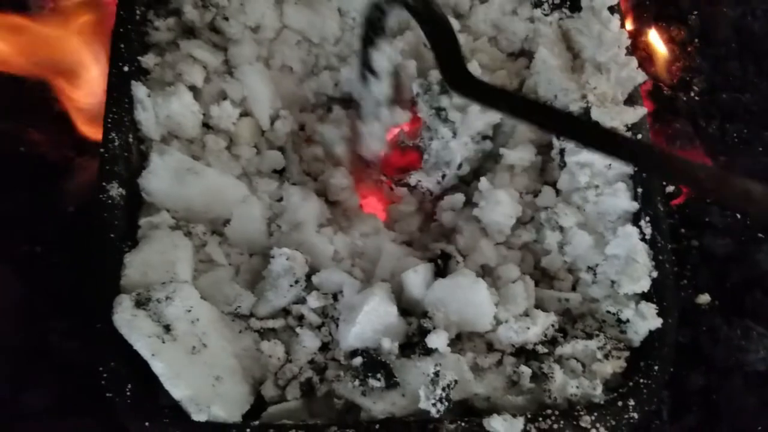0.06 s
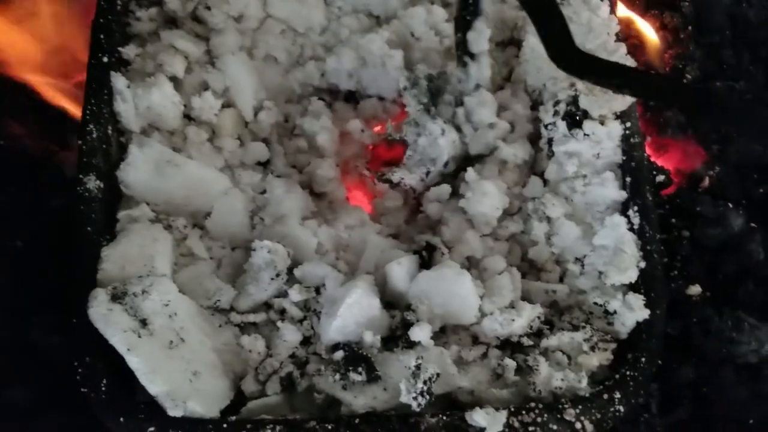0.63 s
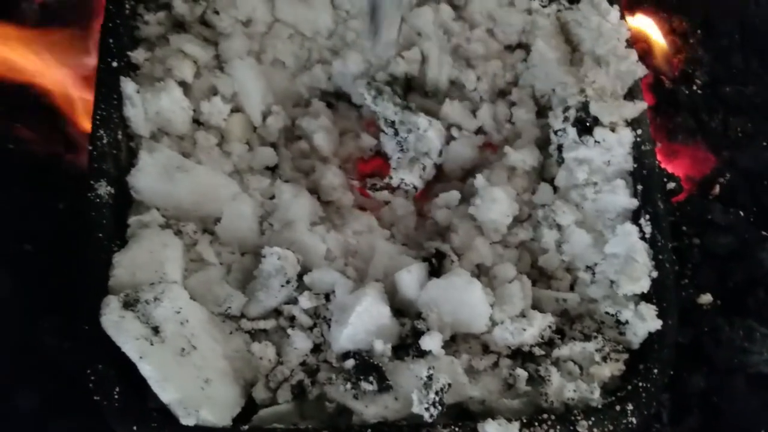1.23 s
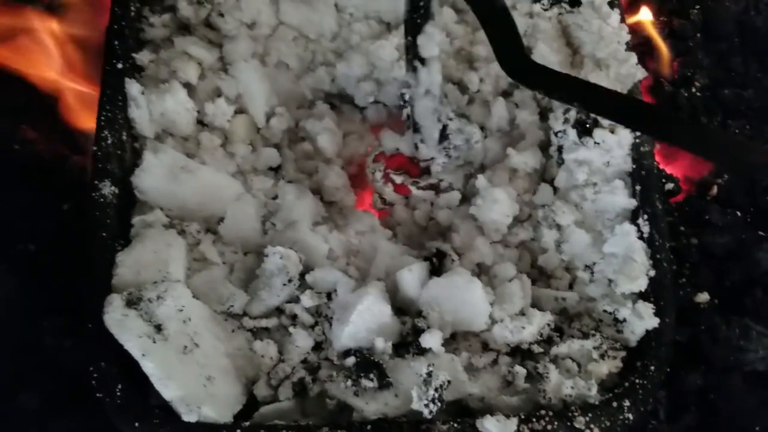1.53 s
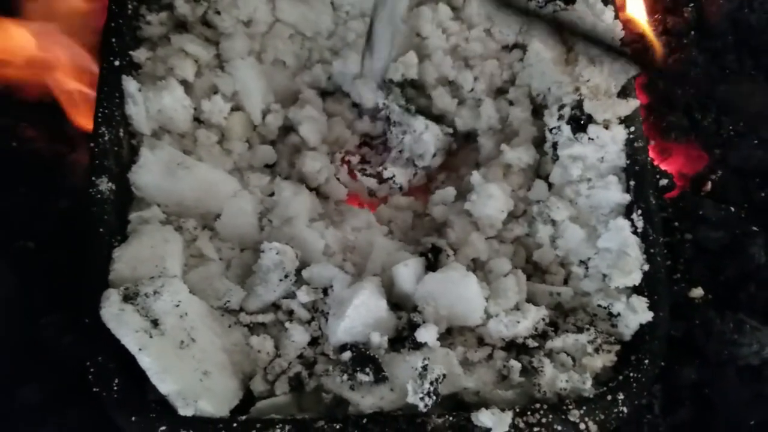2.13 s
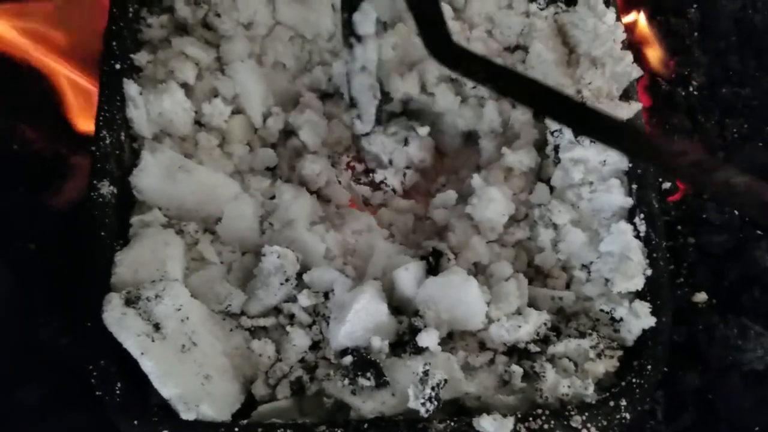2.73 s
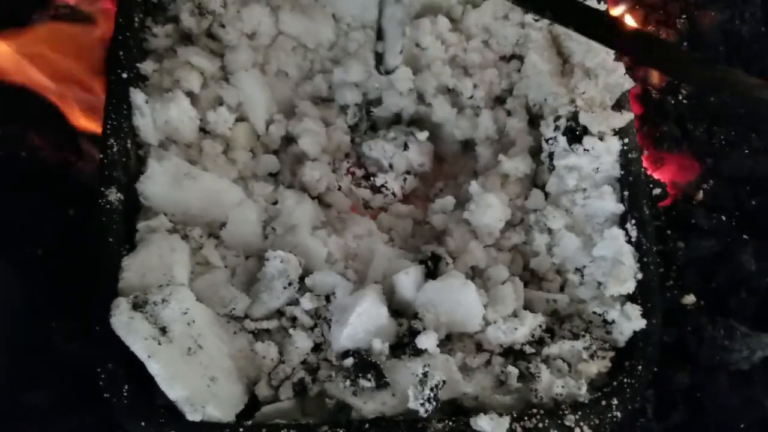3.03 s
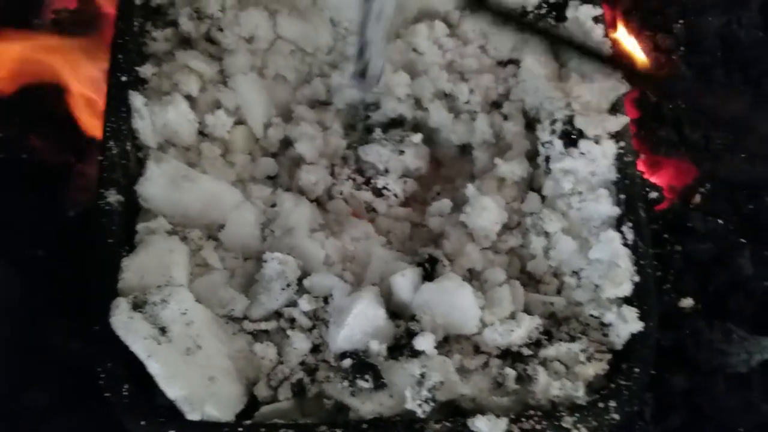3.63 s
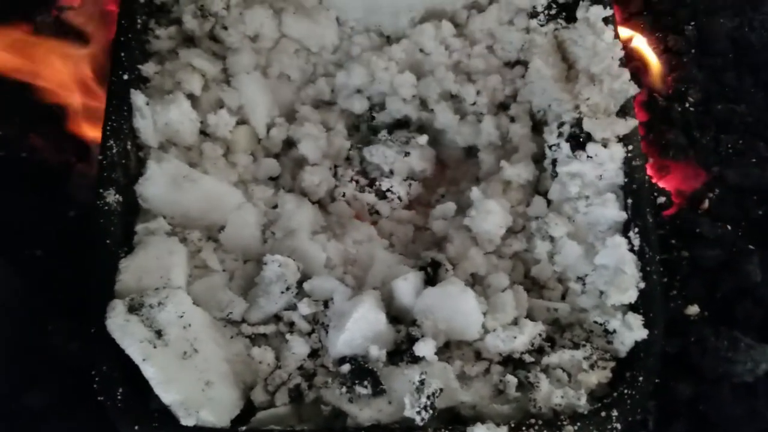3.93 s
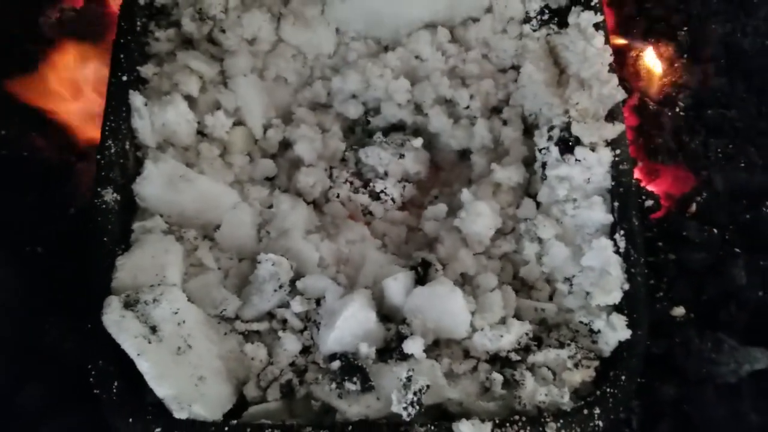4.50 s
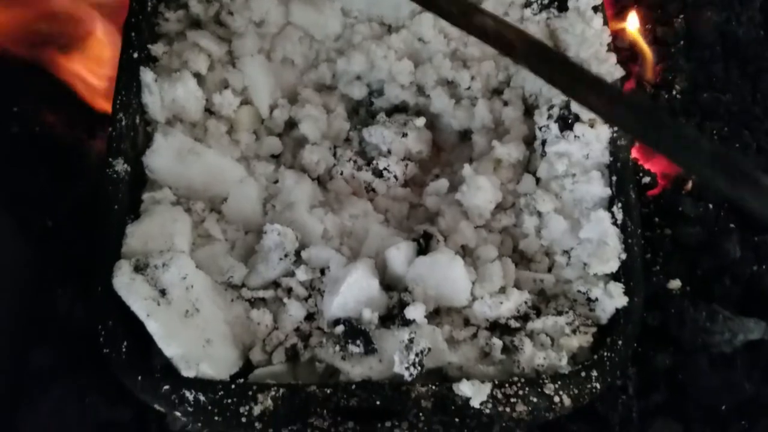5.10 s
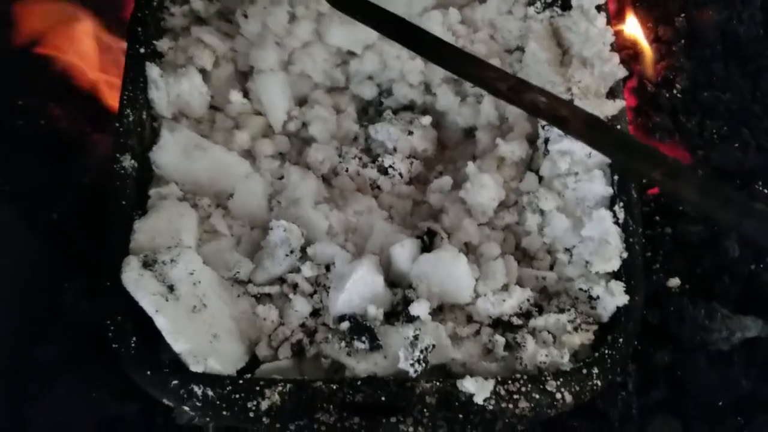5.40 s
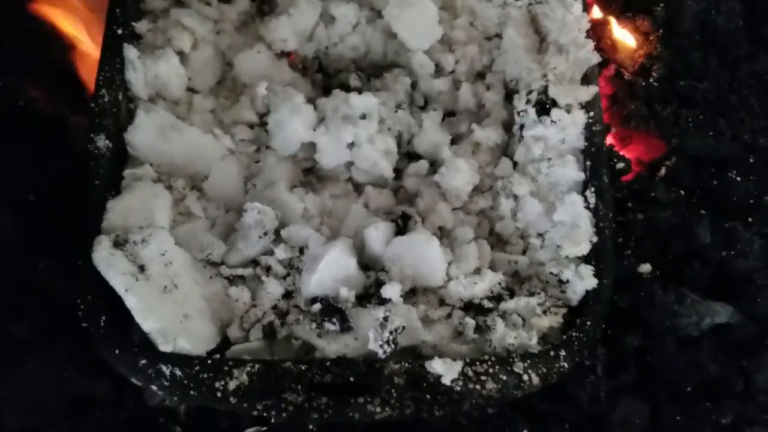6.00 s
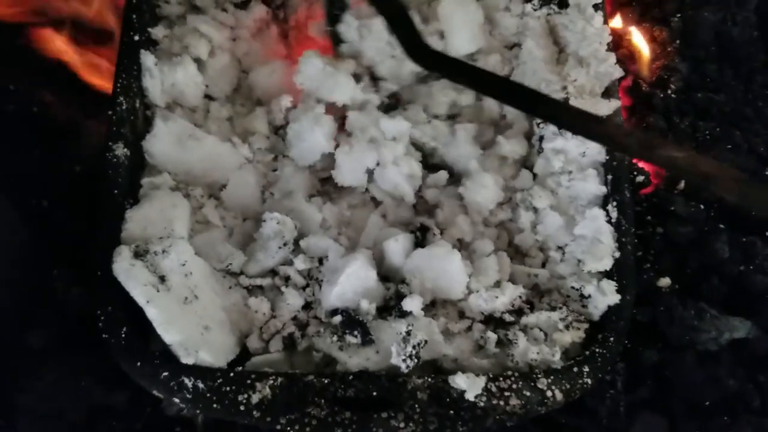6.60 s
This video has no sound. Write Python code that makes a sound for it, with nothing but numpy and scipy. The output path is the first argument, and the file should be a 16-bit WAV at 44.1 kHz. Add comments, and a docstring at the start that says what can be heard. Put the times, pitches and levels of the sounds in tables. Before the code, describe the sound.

Mineral salt sizzles and crackles in a metal pan over a rumbling fire while a metal rod knocks and scrapes through it.

```python
"""Lumps of mineral salt sizzle in a metal pan over a fire, heard from close by.
Steam fizzes out of countless tiny pores, and now and then a crystal snaps.
A metal rod knocks and scrapes through the crust, which damps the pan to a dull clack.
Underneath, the fire rumbles and a few low notes hum faintly."""
import sys
import numpy as np
from scipy import signal
from scipy.fft import rfft, irfft, next_fast_len
from scipy.io import wavfile

SR = 44100
rng = np.random.default_rng(int(sys.argv[2]) if len(sys.argv) > 2 else 0)


def pcm_store(signal):
    """Save signal as 16-bit PCM."""
    levels = np.round(np.clip(np.atleast_2d(signal), -1, 1) * 32767)
    wavfile.write(sys.argv[1], SR, levels.astype(np.int16).T)


N = 297675
TIME = np.arange(N) / SR
FFT_SIZE = next_fast_len(N + SR // 2)
FREQS = np.maximum(np.arange(FFT_SIZE // 2 + 1) * SR / FFT_SIZE, 1)
EAR_LAG_S, CUTOFF_HZ = .00007, 15750

# Table levels are relative: the functions below set the final loudness.
# level of the deep rumble, which wavers unevenly: t/s, level/dB
RUMBLE_LEVEL = [(0.0, -59), (0.09, -62), (1.75, -55.5), (2.39, -62.5), (3.59, -51.5), (3.63, -56.5),
                (4.89, -60), (4.96, -54.5), (6.52, -63), (6.75, -56.5)]
# tone colour of the rumble: f/Hz, level/dB
RUMBLE_COLOUR = [(20, -12), (40, -1.5), (65, 0.5), (120, 3), (190, 0), (230, -6.5), (320, -9), (480, -7),
                 (640, -11.5), (900, -20)]
# notes of the low hum: f/Hz, pitch wander/Hz, level/dB
HUM_NOTES = [(142.5, 5.86, -1), (255.8, 11, -11), (63, 5.5, -16.5)]
# the hum swells: t/s, length/s, level/dB
HUM_SWELLS = [(0.12, 0.052, -50), (0.804, 0.185, -50.5), (1.18, 0.15, -45.5), (1.473, 0.034, -51),
              (1.564, 0.092, -48), (1.784, 0.189, -48), (2.59, 0.03, -54), (2.7, 0.28, -49),
              (3.15, 0.136, -51), (3.358, 0.25, -48.5), (3.654, 0.068, -50), (4.394, 0.092, -50.5),
              (4.544, 0.084, -49.5), (4.953, 0.37, -49.5), (5.817, 0.11, -50.5), (6.613, 0.102, -49)]
# notes of the pan, damped by the salt: f/Hz, level/dB, fade time/s (to fall by 60 dB)
PAN_NOTES = [(334, -30, 0.015), (578, -22.5, 0.095), (814, -6, 0.025), (844, -5, 0.03), (1000, -4.5, 0.017),
             (1200, 5.5, 0.0057), (1300, -2.5, 0.018), (1687, -2, 0.012), (2100, -0.5, 0.0072),
             (2350, 9, 0.0029), (3840, -7, .005)]
# the rod drags through the crust: t/s, length/s, top pitch/Hz, grinding/dB, grit/dB, thud/dB
ROD_SCRAPES = [(2.74, 0.1, 1800, -32, -48, -38), (3.309, 0.07, 1690, -34, -52, -51),
               (3.381, 0.068, 1690, -28, -46, -45), (4.933, 0.032, 2600, -38.5, -43, -42.5),
               (5.007, 0.019, 2300, -28, -45, -53), (5.043, 0.047, 1860, -33.5, -42, -55),
               (5.479, 0.044, 1000, -23.5, -44, -57), (5.529, 0.038, 1530, -25, -37.5, -47.5),
               (6.625, 0.036, 2000, -38, -60, -62)]
# the rod hits lumps and pan: t/s, level/dB, top pitch/Hz
ROD_KNOCKS = [(0.6155, -22, 2100), (1.4125, -26, 2000), (1.8904, -21.5, 2200), (2.7493, -12, 1530),
              (2.7615, -13, 2200), (3.193, -25.5, 1120), (3.335, -18.5, 1800), (3.3901, -15, 1630),
              (3.396, -8.5, 1740), (3.4468, -19, 1800), (3.8182, -21.5, 1180), (4.4596, -26.5, 1160),
              (4.797, -22.5, 1800), (4.9361, -15, 2880), (5.0178, -19.5, 2210), (5.0534, -21, 1880),
              (5.4999, -19.5, 1220), (5.5469, -16.5, 1310), (5.5538, -16, 1170), (5.5928, -22, 1400),
              (5.8187, -18.5, 2700), (5.8808, -27, 1200), (6.6254, -19, 2040), (6.6861, -22.5, 1900)]
# the loudest crystals snap: t/s, level/dB
LOUD_SNAPS = [(0.7301, -7), (0.8435, -7), (1.3484, -11), (1.4753, -4), (1.537, -11), (1.7532, -3),
              (2.272, -5), (3.3787, -7), (4.7907, -4), (6.2014, -6)]
# how hard the salt gives off steam: t/s, level/dB
STEAM_STRENGTH = [(0.0, -38), (0.58, -38.5), (0.83, -35.5), (1.33, -36.5), (2.25, -38.5), (3.46, -37),
                  (4.23, -38), (6.75, -38.5)]
# pockets of steam burst: t/s, extra level/dB
STEAM_SPURTS = [(1.335, 2.5), (1.47, 2.5), (1.75, 3), (2.268, 1), (2.75, 7), (3.36, 3), (6.62, 1)]
# tone colour of the sizzle at each ear: f/Hz, left level/dB, right level/dB
SIZZLE_COLOUR = [(698, -19.5, -31.5), (734, -14, -19.5), (1700, -10, -19.5), (2700, -16.5, -17),
                 (3260, -10, -13), (3970, -9, -12.5), (5640, -10.5, -10.5), (6620, -15.5, -14.5),
                 (8400, -7.5, -15), (9880, -9.5, -28), (11300, 0, -8.5), (13200, 1, -19.5),
                 (14600, -3.5, -8), (15400, -0.5, -16.4)]
# how alike the sound is at the two ears: f/Hz, likeness from 0 to 1
EAR_LIKENESS = [(100, 0.97), (850, 0.65), (1600, .62), (2400, 1), (3300, 0.44), (6000, 0.087),
                (9000, 0.051), (15000, .04)]


def from_db(db):
    """Turn decibels into a number to multiply by."""
    return 10 ** (np.asarray(db) / 20)


def unit_power(x):
    """Scale a signal to an average power of 1."""
    return x / np.sqrt(np.mean(x ** 2) + 1e-20)


def over_time(rows):
    """Join a table's points into one value for every sample."""
    times, values = np.transpose(rows)
    return np.interp(TIME, times, values)


def over_frequency(rows):
    """Join a table's points into one value for every frequency, column by column."""
    hz, *columns = np.transpose(rows)
    return np.array([np.interp(np.log(FREQS), np.log(hz), column) for column in columns])


def shaped(x, gain):
    """Turn each frequency of x up or down by its gain."""
    return irfft(rfft(x, FFT_SIZE) * gain, FFT_SIZE)[..., :N]


def below(hz, steepness):
    """Gains that keep what is below hz and fade out what is above."""
    return 1 / (1 + (FREQS / hz) ** steepness)


def band(x, low_hz, high_hz, order=2):
    """Keep the sound between two frequencies."""
    sections = signal.butter(order, [low_hz, min(high_hz, .45 * SR)], "band", fs=SR, output="sos")
    return signal.sosfilt(sections, x + 1e-18)


def drift(rate_hz):
    """A slow random wobble, about 1 in size."""
    return unit_power(shaped(rng.standard_normal(N), below(rate_hz, 2)))


def grains(per_s, spread_db):
    """Clicks at random moments, many small and a few large."""
    return (rng.random(N) < per_s / SR) * from_db(spread_db * np.minimum(rng.exponential(1, N), 5.5))


def puffs(per_s, spread_db, life_s):
    """Tiny noise puffs at the same moments in two channels, each with its own noise."""
    power = signal.lfilter([1], [1, -np.exp(-1 / (life_s * SR))], grains(per_s, spread_db) ** 2 + 1e-12)
    return unit_power(np.sqrt(power) * rng.standard_normal((2, N)))


def two_ears(pair):
    """A wide source: both ears share the bass, the right one later, while the treble differs."""
    alike = np.clip(over_frequency(EAR_LIKENESS)[0], 0, 1)
    shared = shaped(pair[0], alike * np.exp(-2j * np.pi * FREQS * EAR_LAG_S))
    return np.array([pair[0], shared + shaped(pair[1], np.sqrt(1 - alike ** 2))])


def from_left(x, drop_db):
    """A small source on the left: the right ear hears it later and drop_db weaker."""
    return np.array([x, from_db(-drop_db) * np.interp(TIME - EAR_LAG_S, TIME, x)])


def fire_rumble(gain_db=6.5, right_drop_db=3.0):
    """The fire makes a low roar; its deepest part wavers unevenly in level."""
    level_db = over_time(RUMBLE_LEVEL)
    colour = from_db(over_frequency(RUMBLE_COLOUR)) * below(1100, 4)
    roar = unit_power(shaped(two_ears(rng.standard_normal((2, N))), colour))
    deep = shaped(roar, below(240, 4))
    rumble = from_db(level_db) * deep + from_db(level_db.mean()) * (roar - deep)
    return from_db(gain_db) * rumble * from_db([[0], [-right_drop_db]])


def low_hum(rest_db=-59.5, swell_gain_db=-1.5, rise_s=0.03, fall_s=0.029):
    """A few low, wavering notes hum, swelling and sinking back."""
    hum, swells = np.zeros((2, N))
    for hz, wander_hz, db in HUM_NOTES:
        pitch_hz = hz + wander_hz * drift(rate_hz=13.96)
        tone = np.sin(2 * np.pi * np.cumsum(pitch_hz) / SR)
        hum += from_db(db) * unit_power(tone * from_db(2.8 * drift(rate_hz=12)))
    for start, length, db in HUM_SWELLS:
        corners = [start - rise_s, start, start + length, start + length + fall_s]
        swells += from_db(db + swell_gain_db) * np.interp(TIME, corners, [0, 1, 1, 0])
    return from_left(np.maximum(swells, from_db(rest_db)) * hum, drop_db=0)


def ring(clicks, hz, fade_s):
    """Each click starts a pure tone that fades by 60 dB in fade_s."""
    decay, step = from_db(-60 / (fade_s * SR)), 2 * np.pi * hz / SR
    return signal.lfilter([0, np.sin(step)], [1, -2 * decay * np.cos(step), decay ** 2], clicks + 1e-18)


def soft_contact(hz, top_hz):
    """A soft touch barely stirs notes far above its top pitch."""
    return 1 / np.sqrt(1 + (hz / top_hz) ** 8)


def pan_ring(force_at):
    """Each note of the pan rings with the force that reaches it; neighbours swing opposite ways."""
    notes = sum((-1) ** k * from_db(db) * ring(force_at(hz), hz, fade_s)
                for k, (hz, db, fade_s) in enumerate(PAN_NOTES))
    return band(notes, 180, 6900)


def rod_scrapes(rise_s=0.0013, thud_rise_s=0.017, thud_fade_s=0.048, thud_gain_db=5.0, grit_gain_db=4.5):
    """Grains catch under the rod and rattle the pan; grit crunches, and the pan rocks with a thud."""
    start, length, top_hz, grind_db, grit_db, thud_db = np.transpose(ROD_SCRAPES)
    age = np.maximum(TIME - start[:, None], 0)
    strokes = (1 - np.exp(-age / rise_s)) * np.exp(-np.minimum(age / length[:, None], 8) ** 2)
    slips = grains(per_s=3100, spread_db=1.0) * rng.choice([-1, 1], N)
    grind = pan_ring(lambda hz: slips * ((from_db(grind_db) * soft_contact(hz, top_hz)) @ strokes))
    grind /= pan_ring(lambda hz: slips).std()
    crunch = band(puffs(per_s=5000, spread_db=1.8, life_s=.0004), 2300, 4400)
    grit = (from_db(grit_db + grit_gain_db) @ strokes) * unit_power(shaped(crunch, sizzle_colour()))
    rocking = (1 - np.exp(-age / thud_rise_s)) * np.exp(-age / thud_fade_s)
    low_noise = unit_power(band(rng.standard_normal(N), 154, 236))
    thud = (from_db(thud_db + thud_gain_db) @ rocking) * low_noise
    return from_left(grind, drop_db=7.0) + grit + from_left(thud, drop_db=3.0)


def rod_knocks(ring_db=-9.5, clack_low_hz=700, crumbs_per_s=1500, crumble_db=-14, crumble_s=0.011):
    """Each blow gives a dry clack, rings the pan briefly and crushes a few grains."""
    start, level_db, top_hz = np.transpose(ROD_KNOCKS)
    age = TIME[:SR // 25]
    samples = np.round(start * SR).astype(int)[:, None] + np.arange(len(age))
    click = 1.0 * (age == 0)
    crumbs = (rng.random(samples.shape) < crumbs_per_s / SR) * rng.standard_normal(samples.shape)
    force = click + from_db(crumble_db) * crumbs * np.exp(-age / crumble_s)

    def placed(shapes, gains):
        """Put each blow's shape at its moment in time."""
        return np.bincount(samples.ravel(), (shapes * gains[:, None]).ravel(), N)[:N]

    def force_at(hz):
        """Every blow lands on a new spot, so it stirs this note more or less strongly."""
        spot_db = rng.normal(0, 2.9, len(start))
        return placed(force, from_db(level_db + spot_db) * soft_contact(hz, top_hz))

    shapes = np.array([band(click, min(clack_low_hz, top / 2), top) for top in top_hz])
    clacks = placed(shapes, from_db(level_db) / np.abs(shapes).max(axis=1))
    return from_left(clacks + from_db(ring_db) * pan_ring(force_at), drop_db=8.5)


def crystal_snaps(gain_db=-1.5, fade_s=.0003, small_count=70):
    """Crystals split with a short, bright snap: loud ones at set times, smaller ones at random."""
    snaps, age = np.zeros((2, N)), TIME[:SR // 100]
    small_times = rng.uniform(0, TIME[-1] - age[-1], small_count)
    small_db = rng.normal(-14.5, 1.0, small_count)
    for start, left_db in [*LOUD_SNAPS, *zip(small_times, small_db)]:
        burst = rng.standard_normal((2, len(age))) * np.exp(-age / fade_s)
        snap = band(burst, 10700, 15300, order=4)
        snap /= np.abs(snap).max(axis=1, keepdims=True)
        right_db = left_db - rng.normal(13, 3)
        at = round(start * SR)
        snaps[:, at:at + len(age)] += snap * from_db([[left_db], [right_db]])
    return from_db(gain_db) * snaps


def sizzle_colour(echo_s=0.001272, echo_share=0.028, ring_hz=862, ring_width_hz=12, ring_db=2.5):
    """The sizzle's tone, rippled by an echo off the pan wall and lifted at the pan's main note."""
    echo = 1 + echo_share * np.exp(-2j * np.pi * FREQS * echo_s) * below(7000, 4)
    lift_db = ring_db / (1 + ((FREQS - ring_hz) / ring_width_hz) ** 2)
    bass_cut = 1 / np.sqrt(1 + (580 / FREQS) ** 12)
    return from_db(over_frequency(SIZZLE_COLOUR) + lift_db) * echo * bass_cut * (FREQS < CUTOFF_HZ)


def salt_sizzle(seethe_top_hz=2700, fizz_from_hz=7500, spurt_s=0.032):
    """Melting salt seethes low, steam hisses through the crust, and the finest pores fizz on top."""
    seethe = puffs(per_s=4000, spread_db=1.7, life_s=.0008)
    hiss = puffs(per_s=12000, spread_db=1.9, life_s=.0004)
    fizz = puffs(per_s=14000, spread_db=2.7, life_s=.0003)
    steam_db = over_time(STEAM_STRENGTH)
    swing_db = steam_db - steam_db.mean()
    spurt_db = sum(db * (TIME > start) * np.exp(-np.abs(TIME - start) / spurt_s)
                   for start, db in STEAM_SPURTS)
    flutter_db = 0.54 * drift(rate_hz=11)   # the steam comes unevenly
    covered_db = 1.56 * (TIME > 5.6)   # lumps pushed over the hot spot muffle the fizz
    low, high = below(seethe_top_hz, 10), 1 - below(fizz_from_hz, 10)
    # each layer: its puffs, its share of each frequency, its level in dB
    layers = [(seethe, low, -42.5 + 1.13 * swing_db),
              (hiss, np.abs(1 - low - high), -36.5 + swing_db + spurt_db / 2 + flutter_db),
              (fizz, high, -28.0 + 0.78 * swing_db + spurt_db + flutter_db - covered_db)]
    colour = sizzle_colour()
    return sum(from_db(level_db) * unit_power(shaped(two_ears(steam), colour * np.sqrt(share)))
               for steam, share, level_db in layers)


def scene():
    """Salt, rod, fire and hum sound together."""
    return salt_sizzle() + crystal_snaps() + rod_knocks() + rod_scrapes() + fire_rumble() + low_hum()


def record(dry):
    """Cut off the very highest treble steeply."""
    return signal.sosfilt(signal.ellip(12, .1, 80, CUTOFF_HZ, fs=SR, output="sos"), dry)


dry = scene()
out = record(dry)
pcm_store(out)
```